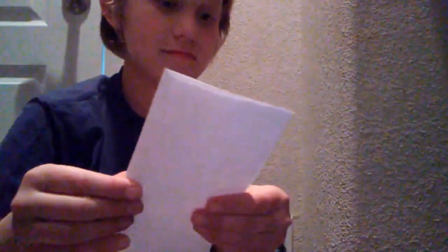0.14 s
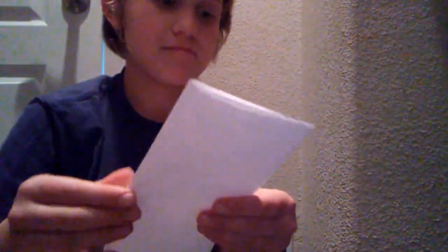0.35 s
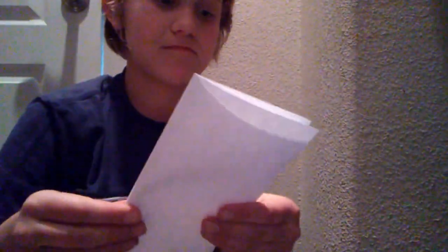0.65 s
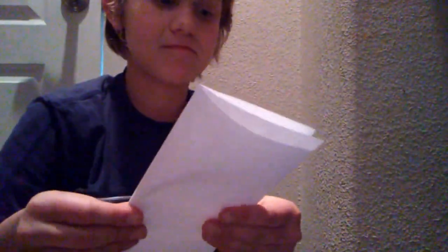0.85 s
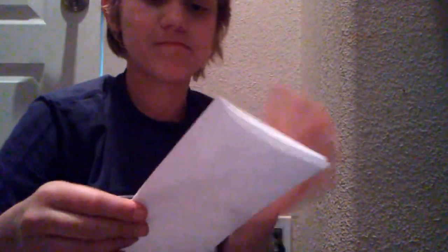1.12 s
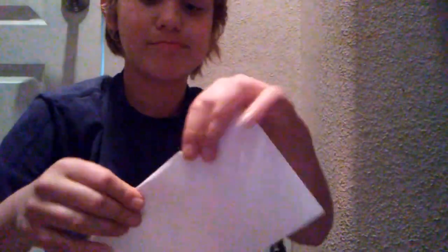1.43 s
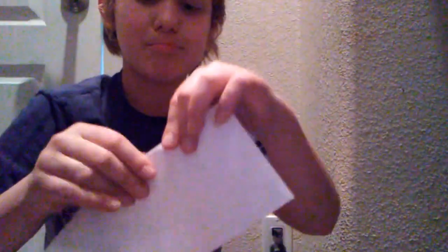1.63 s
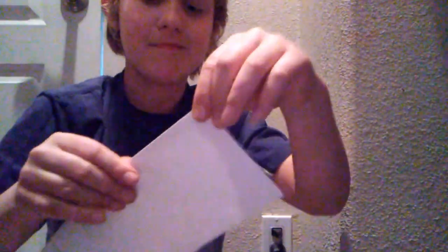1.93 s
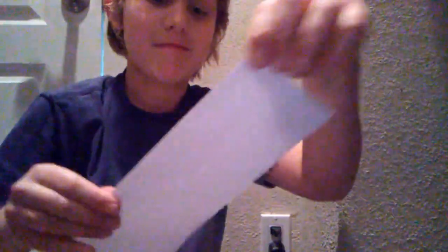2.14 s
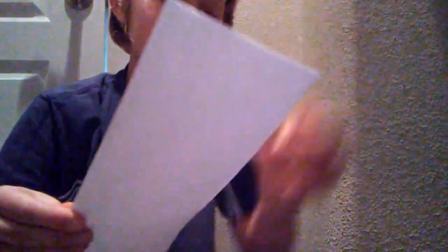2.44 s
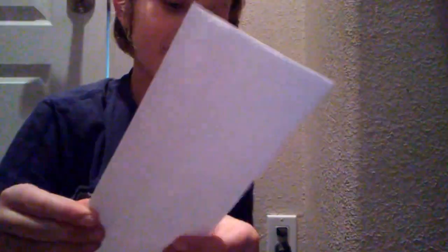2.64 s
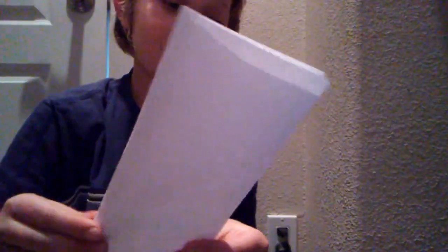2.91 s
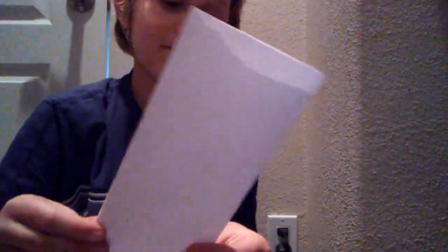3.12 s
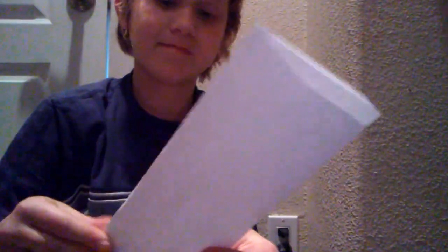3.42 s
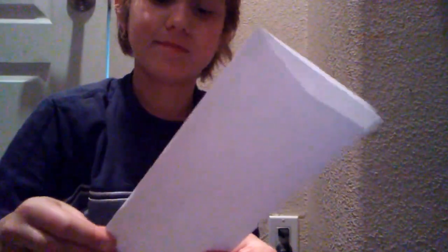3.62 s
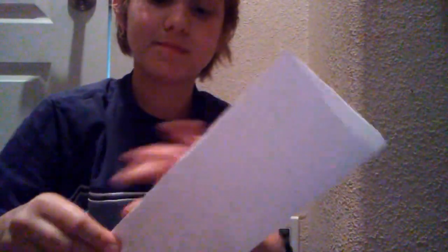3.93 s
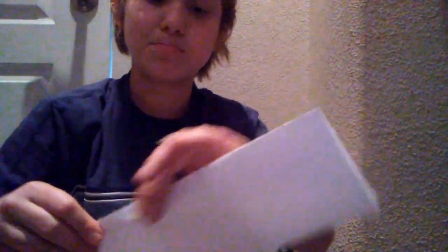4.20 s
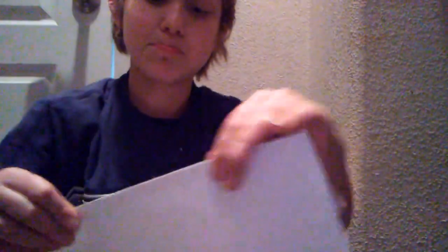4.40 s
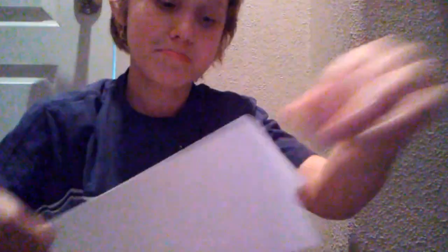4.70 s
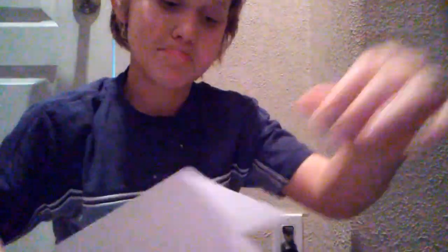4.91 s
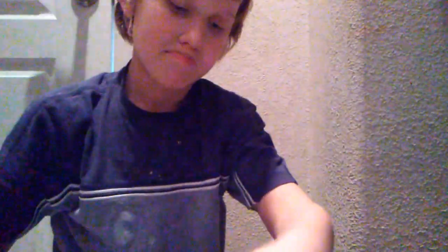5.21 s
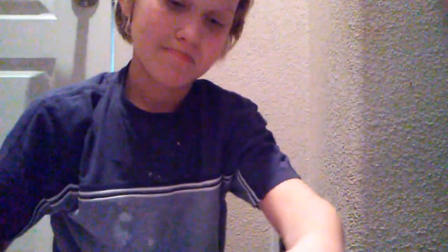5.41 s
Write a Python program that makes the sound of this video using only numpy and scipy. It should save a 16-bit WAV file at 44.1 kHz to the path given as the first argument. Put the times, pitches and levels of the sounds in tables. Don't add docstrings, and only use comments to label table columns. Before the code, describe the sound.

Stiff paper pops, crackles and rustles very near a cheap microphone indoors. Sparse early snaps lead to a sharp crack before two seconds, then bright strokes, a loud dry snap near four, a cluster of hard cracks, a lull and a final crackling flurry. Swings thump softly as low rumble; recorder noise and a thin high tone sink when the paper is quiet.

```python
import sys
import numpy as np
from scipy import signal
from scipy.fft import rfft, irfft
from scipy.io import wavfile
from scipy.ndimage import uniform_filter1d

SR = 44100
rng = np.random.default_rng(int(sys.argv[2]) if len(sys.argv) > 2 else 0)


def gain_from_db(level_db):
    decades = np.asarray(level_db, float) / 20
    return 10 ** decades


def master(y):
    cut = np.clip(np.atleast_2d(y).T, -1, 1)
    pcm = np.round(cut * 32767)
    wavfile.write(sys.argv[1], SR, pcm.astype(np.int16))


N = 244755


def rms_one(x):
    return x / np.sqrt(np.mean(x ** 2) + 1e-20)


def at_hz(points, hz):
    points = np.array(points)
    return np.interp(np.log(hz), np.log(points[:, 0]), points[:, 1])


def drift(rate):
    r = np.exp(-2 * np.pi * rate * 16 / SR)
    chance = rng.standard_normal(N // 16 + 1002)
    slow = signal.lfilter([1], [1, -2 * r, r * r], chance)[1000:]
    return np.interp(np.arange(N) / 16, np.arange(len(slow)), rms_one(slow))


def grains(count, per_s, spread_db):
    size_db = spread_db * np.minimum(rng.exponential(1, count), 5)
    clicks = gain_from_db(size_db) * rng.choice([-1, 1], count)
    return rms_one(clicks * (rng.random(count) < per_s / SR))


def coloured(x, spectrum, patchy_db, count=7, per_s=39.0):
    low_hz, high_hz = spectrum[0][0], spectrum[-1][0]
    hz = np.maximum(np.fft.rfftfreq(N, 1 / SR), 1)
    whole = rfft(x) * gain_from_db(at_hz(spectrum, hz)) * (hz > low_hz) * (hz < high_hz)
    centres = np.geomspace(low_hz, high_hz, num=count)
    step = np.log(centres[1] / centres[0])
    total = np.zeros(N)
    for centre in centres:
        band = np.cos(np.pi / 2 * np.clip(np.log(hz / centre) / step, -1, 1)) ** 2
        total += irfft(whole * band, N) * gain_from_db(patchy_db * drift(per_s))
    return rms_one(total)


def gestures(start_s, length_s, level_db, swell_db, rise, fall, rest_db):
    since = np.arange(0, N + 32, 32)[:, None] / SR - start_s
    length_s = np.maximum(length_s, 0.005)
    db = level_db + swell_db * np.clip(since / length_s, 0, 1)
    db = db + rise * np.minimum(since, 0) - fall * np.maximum(since - length_s, 0)
    power = np.sum(gain_from_db(db) ** 2, axis=1) + gain_from_db(rest_db) ** 2
    return np.interp(np.arange(N) / 32, np.arange(len(power)), np.sqrt(power))


# [delay/ms, wander/ms, level/dB]
MIRRORS = [
    (0.358, 0.026, -13),
    (2.602, 0.11, -5),
    (4.302, 0.063, -3.5),
]


def mirrored(x):
    total = x
    for delay_ms, wander_ms, db in MIRRORS:
        delay = SR / 1000 * (delay_ms + wander_ms * drift(1.5))
        heard_at = np.clip(np.arange(N) - delay, 0, N - 1).astype(int)
        total = total + gain_from_db(db) * x[heard_at]
    return rms_one(total)


# [t/s, length/s, hiss level/dB, swell/dB, scrape against hiss/dB]
GRIPS = [(0.0, 0.12, -66.5, -11, -17), (0.176, 0.16, -59, 0.5, 1), (0.356, 0.12, -51.5, -12.5, -2.5),
         (0.74, 0.19, -76, -4, 9), (1.456, 0.049, -45, -8, -9), (1.529, 0.027, -38.5, 4, -2.5),
         (1.582, 0.07, -52, 8.5, -4.5), (1.708, 0.08, -49, -7, -9), (2.01, 0.07, -57.5, -1, -0.5),
         (2.388, 0.034, -54.5, 6, -2), (2.775, 0.09, -55, -6, -5), (3.152, 0.031, -46, 9, 1),
         (3.216, 0.15, -66, 5, 1), (3.71, 0.16, -63.5, 2, -1.5), (3.849, 0.1, -49, 3, -3),
         (4.164, 0.027, -51.5, -5, 12.5), (5.243, 0.09, -32, -17, 6), (5.462, 0.041, -44.5, -5.5, 16),
         (1.24, 0.09, -63, -19, 1), (2.6, 0.17, -77, 1, 3), (3.502, 0.028, -47, -7.5, -6)]
# [t/s, length/s, hiss level/dB, swell/dB, scrape against hiss/dB]
STROKES = [(0.545, 0.094, -43.5, -7, 4.5), (1.09, 0.12, -54.5, 6.5, -13), (1.796, 0.078, -52, 11.5, 1.5),
           (1.89, 0.076, -37.5, -1, -4.5), (2.088, 0.067, -43.5, 8, -5.5),
           (2.164, 0.044, -32.5, -8.5, -3.5), (2.218, 0.11, -44, 3.5, -5), (2.867, 0.085, -42.5, 2.5, -5),
           (3, 0.042, -55.5, 1, -6.5), (3.06, 0.067, -55, 3.5, -8), (3.487, 0.196, -53, -2, -10),
           (4.197, 0.13, -45, 9, -2.5), (4.339, 0.28, -35.5, 0, -2), (4.65, 0.058, -36, -6.5, -8),
           (4.73, 0.12, -42, 2, -9), (5.297, 0.225, -45, -2, -0.5)]
# [f/Hz, level/dB]
HISS_COLOUR = [(2350, -34), (4000, -3.5), (5280, 0), (8070, 5), (10300, -5.5), (12900, -19.5),
               (15100, -18.5), (16000, -27)]
SCRAPE_COLOUR = [(700, -15.5), (1000, -2), (1700, 3.5), (2500, 4.5), (4200, 5.5), (6000, 2), (9000, -22)]
# [t/s, level/dB]
FINGERTIP = [(0.4, 2), (0.59, -2), (1.15, -1.5), (1.5, -1), (1.88, -3.5), (2.14, -1), (2.3, -4), (2.8, -7),
             (2.92, -7.5), (3.08, -1.5), (3.18, -9), (3.55, -1), (3.87, -7), (4.25, 0), (4.4, 2), (4.78, 4),
             (5.3, 0), (5.5, -3)]
FINGERTIP_HZ = [6950, 9200]


def fingers(clumps):
    s, length_s, hiss_db, swell_db, press_db = np.transpose([*STROKES, *GRIPS])
    rise = np.repeat([1098.5, 3500], [len(STROKES), len(GRIPS)])  # dB/s, grips catch faster
    finger = dict(rise=rise, fall=603.5, rest_db=-88)
    light = gestures(s, length_s, hiss_db, swell_db, **finger)
    heavy = gestures(s, length_s, hiss_db + press_db, swell_db, **finger)

    skin = grains(count=N, per_s=14000, spread_db=2.2)
    hiss = mirrored(coloured(skin, HISS_COLOUR, patchy_db=1.7, count=17, per_s=2.5))
    hiss = hiss * light * gain_from_db(1.1 * clumps)
    whistle_band = signal.butter(2, FINGERTIP_HZ, "band", fs=SR, output="sos")
    whistle = signal.sosfiltfilt(whistle_band, hiss)
    whistle_db = np.interp(np.arange(N) / SR, *np.transpose(FINGERTIP))
    hiss = hiss + whistle * (gain_from_db(whistle_db) - 1)

    torn = gain_from_db(-12) * grains(count=N, per_s=160, spread_db=4.0)
    rough = torn + grains(count=N, per_s=5000, spread_db=2.5)
    scrape = mirrored(coloured(rough, SCRAPE_COLOUR, patchy_db=1.2, count=10, per_s=5.0))
    return hiss + scrape * heavy * gain_from_db(1.6 * clumps)


# [f/Hz, time to fall 60 dB/s]
ROOM_T60 = [(300, 0.093), (2000, 0.077), (9000, 0.094)]


def room_tail(size):
    first_echo_ms = 1.9
    t = np.arange(size) / SR
    dense = rfft(rng.standard_normal(size))
    log_hz = np.log(np.maximum(np.fft.rfftfreq(size, 1 / SR), 20))
    centres = np.log(np.array(ROOM_T60)[:, 0])
    tail = np.zeros(size)
    for (_, t60), row in zip(ROOM_T60, np.eye(len(centres))):
        share = np.sqrt(np.interp(log_hz, centres, row))
        tail += irfft(dense * share) * gain_from_db(-60 * t / t60)
    tail = tail * np.clip(1000 * t / first_echo_ms, 0, 1) ** 2
    return tail / np.sqrt(np.sum(tail ** 2))


def causal(level_db):
    folded = irfft(level_db * np.log(10) / 20)
    half = len(folded) // 2
    folded[1:half] *= 2
    folded[half + 1:] = 0
    return np.exp(rfft(folded))


def crackle(size, length_ms):
    t_ms = 1000 * np.arange(size) / SR
    fade = np.exp(-t_ms / length_ms) * (1 - np.exp(-t_ms / (0.07 * length_ms)))
    burst = grains(count=size, per_s=18000, spread_db=2.5) * fade
    burst[int(0.1 * length_ms * SR / 1000)] = 2.2
    return burst / np.sqrt(np.sum(burst ** 2))


# [t/s, level/dB, brightness/dB, crackle length/ms]
CRACKS = [(0.172, -52.5, -14.5, 2.6), (0.213, -42.5, -11, 19), (0.287, -48, -18.5, 5.5),
          (0.355, -55.5, 0, 9.9), (0.755, -43.5, -9, 2.2), (0.808, -41.5, -11.5, 3.7),
          (0.831, -57, -5, 4.8), (0.855, -53, -25.5, 3.4), (0.994, -61, -19, 3.8), (1.558, -36, -3.5, 16),
          (1.645, -38.5, -7, 1.9), (1.974, -44.5, -13.5, 3), (2.16, -34, -4.5, 3.0),
          (2.241, -46.5, -23.5, 2.4), (2.267, -48, -9, 6.2), (4.173, -33, -1.5, 7.7),
          (5.077, -53.5, -7, 7.2), (5.363, -37, 3, 1.6), (5.402, -51, 8, 2.6), (5.471, -35.5, -3, 2.4)]
POPS = [(0.267, -46.5, -23, 1.5), (0.377, -59, 19, 7.6), (0.397, -49, -1.5, 2.4), (1.124, -49.5, -5, 3.6),
        (1.137, -41.5, -14, 16), (1.624, -31, -4, 0.78), (1.713, -47, 5, 6), (1.732, -49.5, -15, 13),
        (1.854, -33, -12.5, 6), (2.04, -48, -9, 2.2), (2.408, -39, -9, 2.3), (2.784, -36, -8, 2.7),
        (2.809, -49, -19, 5.9), (3.581, -35, -8.5, 4.2), (3.647, -39, -10, 2.8), (3.67, -37, -10.5, 5.7),
        (3.886, -35, -2, 3.8), (4.495, -27, -3, 2), (4.503, -31, 2, 10), (5.114, -64.5, -29.5, 9.4),
        (5.2205, -21.5, 3.5, 18), (5.318, -32, -4, 9.0)]
FLAPS = [(0.471, -56, -3, 1.4), (0.588, -37.5, -7, 4.0), (0.749, -32.5, -10, 2.9), (1.242, -57, -12, 3.4),
         (1.944, -46, -16, 5.6), (2.07, -39, 1, 3.5), (2.081, -35.5, -3, 2.9), (2.401, -43, 9.5, 4.3),
         (2.751, -49.5, -5, 5.2), (2.923, -43.5, -10.5, 2.5), (3.157, -44.5, 9.5, 15),
         (3.186, -27.5, -2, 2.9), (3.408, -66.5, -30, 8.2), (3.446, -51, -11, 6.7), (3.544, -44, -10, 3.8),
         (3.608, -38.5, -10, 2.5), (3.796, -50, -14.5, 4.3), (3.85, -38, -8, 1.8), (4.154, -29.5, -4.5, 17),
         (4.476, -52, 23, 1.5), (4.848, -33.5, 0.5, 5.1), (5.008, -39, -13, 5.1), (5.46, -33, 7, 2.9),
         (5.485, -21.5, 4, 5.6), (0.635, -51.5, 16, 1.5), (0.335, -57, 9, 3)]
MORE_SNAPS = [(0.245, -50, 3, 2.0), (0.281, -51, -26, 2.5), (0.428, -57, 13, 1.4), (0.439, -52.5, -2, 2.5),
              (3.465, -59.5, -24, 2.5), (3.496, -52.5, 16, 1.6), (3.639, -48, -8, 0.8), (3.665, -48.5, 11, 1.1),
              (4.165, -35, -7, 9.0), (4.368, -37.5, -3.5, 3.7), (5.214, -47, -12, 6.5), (5.246, -30, 8, 2.5),
              (5.259, -25, -3, 5.7), (5.329, -34, 0, 2.6), (5.422, -48, -4, 1.5), (5.443, -45, 15, 2.9),
              (5.492, -33.5, 7, 2.3), (2.948, -47.5, 4, 3), (1.089, -59, 2, 3.0), (1.455, -48.5, 9, 2.2)]
# [.., ring f/Hz]
RINGERS = [(0.208, -27.5, -7, 7.4, 1190), (0.497, -30, -7, 3.2, 1190), (1.208, -32.5, -5.5, 3.0, 2400),
           (1.761, -17.5, 0.5, 4.2, 2720), (2.171, -34, -12, 3.6, 1260), (3.295, -32.5, -7.5, 7.2, 1200),
           (3.74, -30, -1.5, 1.65, 2840), (3.9, -40.5, -5, 2.5, 5300), (4.444, -20, 2.5, 1.24, 4270),
           (4.515, -15.5, 2, 6.9, 4100), (4.551, -19.5, 6.5, 2.8, 4260), (4.253, -30.5, -1, 2.8, 4470),
           (3.502, -41.5, 9, 4.8, 5240), (5.248, -24, 4, 3.5, 3160), (5.4465, -28, 10, 1.6, 5500),
           (5.454, -30, 2, 7.6, 4000)]
# [.., hollow f/Hz]
HOLLOWS = [
    (3.911, -16.5, 7.5, 0.6, 3900),
    (3.916, -28.5, 12.5, 2.4, 2800),
    (4.62, -17.5, 6, 1.4, 3930),
    (4.625, -24, 6.5, 3.5, 6800),
    (1.189, -33.5, 4.5, 2.0, 3500),
    (0.205, -35, 2, 3.5, 4200),
]
# [.., note f/Hz]
SINGERS = [
    (5.449, -26, 3, 3.7, 3640),
    (3.911, -33, 22, 0.8, 9400),
    (2.171, -38, -10, 2.0, 1210),
    (1.617, -56, -17, 4.0, 500),
    (0.498, -43, -18, 3.7, 415),
    (1.767, -26, 3, 3.6, 4100),
    (2.187, -44, -6, 1.5, 2200),
    (2.009, -56, 3, 2.0, 6300),
]
SNAP_BANDS_HZ = [650, 2600, 7000, 14000]
# [f/Hz, level/dB]
SNAP_COLOUR = [(120, -11.5), (300, -5.5), (750, -0.5), (1150, 8), (2500, 9.5), (5000, 9.5), (8500, 5),
               (10500, -8.5), (13000, -26), (17000, -39)]


def snaps():
    size = 8192
    out = np.zeros(N + size)
    log_hz = np.log(np.maximum(np.fft.rfftfreq(size, 1 / SR), 20))
    humps = np.log(np.geomspace(250, 12000, num=16))
    tilt_db = at_hz(SNAP_COLOUR, np.exp(log_hz)) - 2.27 * (log_hz - np.log(2600)) / np.log(2) + 21

    # middle band dB, then dB and width in octaves of its peak or dip
    rows = [(*row, 1.4, 5, 0.25) for row in RINGERS]
    rows += [(*row, 1.4, -10.5, 0.45) for row in HOLLOWS]
    for table, middle_db in [(CRACKS, 10), (POPS, 0.7), (FLAPS, -9.5), (MORE_SNAPS, 2.5)]:
        rows += [(*row, 1000, middle_db, 0, 1) for row in table]
    rows += [(*row, 1.4, 13, 0.15) for row in SINGERS]

    for s, peak_db, bright_db, length_ms, ring_hz, middle_db, ring_db, octaves in rows:
        source = crackle(size, np.clip(length_ms, 0.3, 14)) + gain_from_db(-4) * room_tail(size)
        band_db = [-bright_db, middle_db, bright_db, 1.38 * bright_db]
        shape_db = 1.3 * rng.standard_normal(len(humps))
        level_db = peak_db + tilt_db + np.interp(log_hz, np.log(SNAP_BANDS_HZ), band_db)
        level_db = level_db + np.interp(log_hz, humps, shape_db)
        off_ring = (log_hz - np.log(ring_hz)) / np.log(2) / octaves
        level_db = level_db + ring_db * np.exp(-off_ring ** 2)
        at = round((s + 0.001) * SR)
        out[at:at + size] += irfft(rfft(source) * causal(level_db))
    return out[:N]


# [t/s, length/s, level/dB, swell/dB]
BENDS = [(0.179, 0.3, -52, -19), (0.503, 0.14, -58, 0), (0.764, 0.094, -54.5, 4), (0.903, 0.33, -69, -1),
         (1.13, 0.099, -65, 20.5), (1.462, 0.065, -55, -25), (1.524, 0.049, -47, 9.5),
         (1.616, 0.072, -55, 10), (1.722, 0.07, -60.5, 18.5), (1.755, 0.11, -36.5, -20),
         (1.882, 0.12, -57, 3), (2.111, 0.086, -60.5, 23), (2.219, 0.16, -43.5, -21.5),
         (2.375, 0.32, -73, 8), (2.743, 0.19, -60, 0.5), (2.876, 0.056, -48, -20),
         (3.162, 0.096, -51.5, -8.5), (3.299, 0.079, -49.5, -17), (3.447, 0.19, -58, 8.5),
         (3.697, 0.19, -62.5, -6.5), (3.839, 0.11, -64.5, 21.5), (3.944, 0.12, -52.5, -12),
         (4.167, 0.2, -43.5, -12), (4.365, 0.14, -55, 11.5), (4.553, 0.09, -38, 1.5),
         (4.852, 0.32, -42.5, -26), (5.222, 0.047, -43.5, 4), (5.267, 0.18, -40, -17.5),
         (5.455, 0.059, -39.5, -11)]
# [f/Hz, level/dB]
RUSTLE_COLOUR = [(150, -22.5), (250, -9), (420, -1), (750, -1), (1200, -1), (2200, -8.5), (3500, -19),
                 (7000, -27)]


def rustle(clumps):
    bend = gestures(*np.transpose(BENDS), rise=1301.5, fall=447.5, rest_db=-82)
    fibres = grains(count=N, per_s=4000, spread_db=1.8)
    return coloured(fibres, RUSTLE_COLOUR, patchy_db=1.2) * bend * gain_from_db(1.3 * clumps)


# [t/s, length/s, level/dB]
SWINGS = [(0.211, 0.014, -38), (0.278, 0.027, -63), (0.47, 0.05, -48), (0.633, 0.016, -55),
          (0.756, 0.052, -50), (0.84, 0.03, -60), (1.173, 0.05, -51.5), (1.462, 0.027, -60),
          (1.542, 0.025, -46), (1.741, 0.024, -44), (1.94, 0.04, -50), (2.154, 0.049, -44),
          (2.28, 0.09, -58.5), (2.782, 0.022, -48.5), (3.18, 0.049, -51), (3.287, 0.03, -58),
          (3.5, 0.025, -50.5), (3.58, 0.047, -49), (3.68, 0.092, -53), (3.91, 0.043, -51),
          (4.163, 0.018, -43), (4.28, 0.056, -54), (4.435, 0.032, -51.5), (4.511, 0.057, -42),
          (4.617, 0.028, -47), (4.864, 0.051, -47), (4.984, 0.039, -55), (5.235, 0.05, -48),
          (5.313, 0.02, -53), (5.457, 0.044, -53)]
# [f/Hz, level/dB]
PUSH_COLOUR = [(18, -41), (32, -20.5), (46, 5), (59, 5), (140, -4.5), (222, 2.5), (280, -27.5), (360, -78),
               (620, -120)]


def air_push():
    swing = gestures(*np.transpose(SWINGS), swell_db=0, rise=605, fall=223.5, rest_db=-68.5)
    return coloured(rng.standard_normal(N), PUSH_COLOUR, patchy_db=1.8) * swing


def resonance(x, hz, width_hz):
    r = np.exp(-np.pi * width_hz / SR)
    poles = [1, -2 * r * np.cos(2 * np.pi * hz / SR), r * r]
    return signal.lfilter([(1 - r * r) / 2, 0, (r * r - 1) / 2], poles, x + 1e-18)


# [f/Hz, width/Hz, level/dB]
HOUSING = [
    (421, 68.6, 1.8),
    (1017.5, 37, -5.5),
    (621, 92, -7.5),
    (840, 480, -16),
]


def housing(paper):
    total = paper
    for (hz, width_hz, db), sign in zip(HOUSING, [1, 1, 1, -1]):
        total = total + sign * gain_from_db(db + 4.5) * resonance(paper, hz, width_hz)
    return total


def scene():
    clumps = drift(26.0)
    paper = fingers(clumps) + snaps() + rustle(clumps)
    return np.tile(housing(paper) + air_push(), (2, 1))


def gate(dry):
    treble_power = uniform_filter1d(np.diff(dry[0], prepend=0) ** 2, size=400)
    loud_db = 10 * np.log10(treble_power + 1e-12)
    loud_db[0] = -47
    fall_db = 47.5 * np.arange(N) / SR
    held_db = np.maximum.accumulate(np.maximum(loud_db, -70) + fall_db) - fall_db
    return np.clip(held_db + 46, -15, 0)


def whine():
    tone = np.sqrt(2) * np.sin(2 * np.pi * 8000.5 * np.arange(N) / SR)
    return gain_from_db(-69 + 0.7 * drift(25.0)) * tone


# [f/Hz, level/dB]
SELF_NOISE_COLOUR = [(40, 8), (200, -2), (420, -1), (900, -10.5), (2000, -13.5), (5000, -16.5),
                     (9000, -14.5), (12000, -17.5), (16000, -19.5)]


def self_noise():
    return gain_from_db(-60) * coloured(rng.standard_normal(N), SELF_NOISE_COLOUR, patchy_db=0, count=2)


def overload(x):
    knee = 1.3
    return knee * np.arcsinh(x / knee) + 0.035 * x ** 2


BAND_HZ = [42, 15850]


def band_limit(x):
    x = signal.sosfilt(signal.butter(4, BAND_HZ[0], "high", fs=SR, output="sos"), x)
    return signal.sosfilt(signal.ellip(6, 0.3, 32, BAND_HZ[1], fs=SR, output="sos"), x)


def low_pass(x):
    return signal.sosfilt(signal.butter(12, 17010, fs=SR, output="sos"), x)


def record(dry):
    open_db = gate(dry)
    mix = overload(dry) + gain_from_db(open_db) * whine()
    mix = mix + gain_from_db(0.59 * open_db) * self_noise()
    return low_pass(band_limit(mix))


dry = scene()
out = record(dry)
master(out)
```